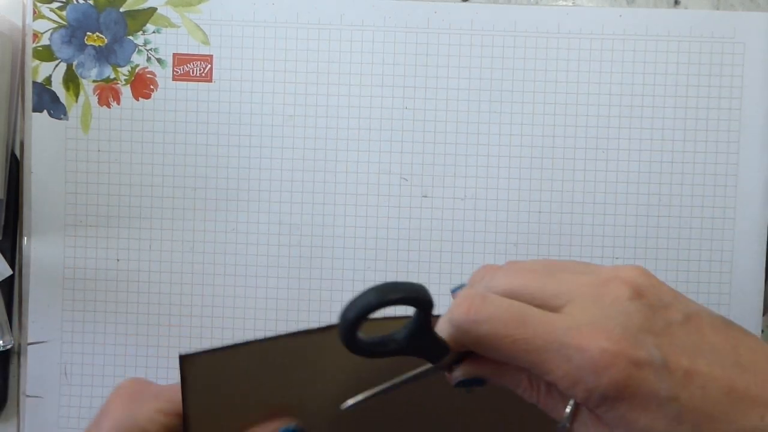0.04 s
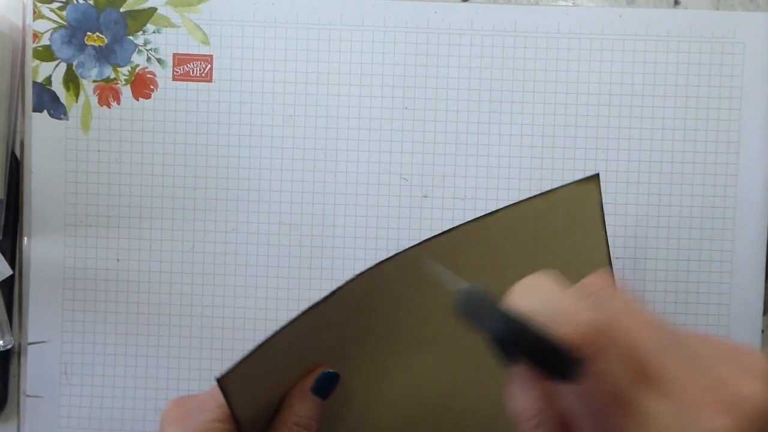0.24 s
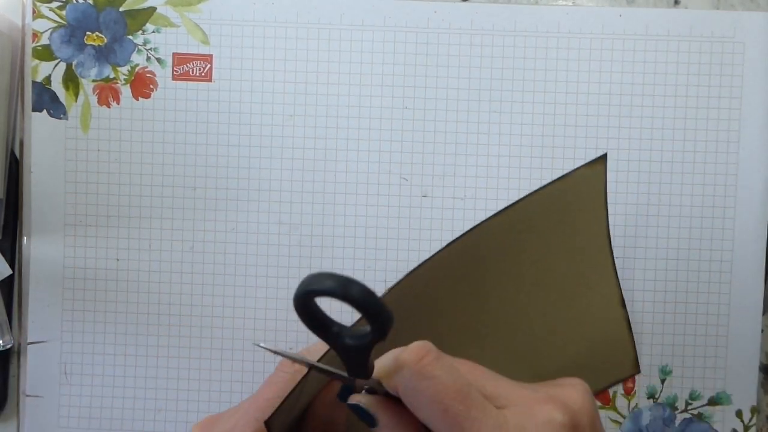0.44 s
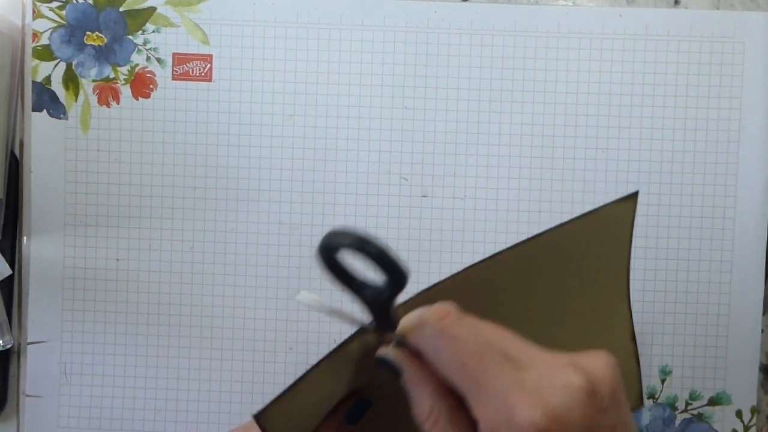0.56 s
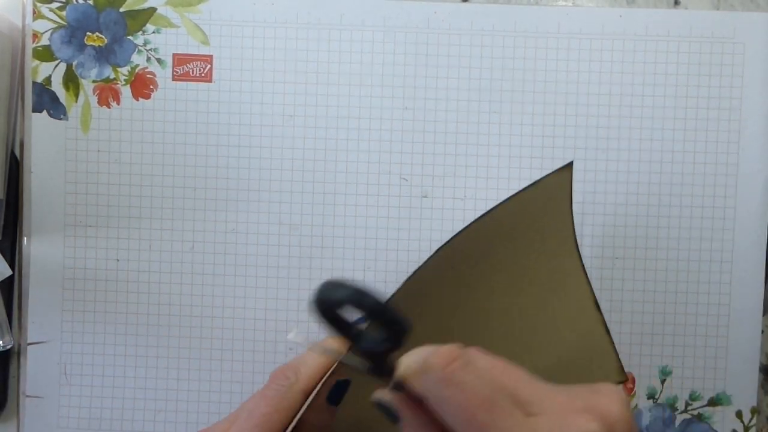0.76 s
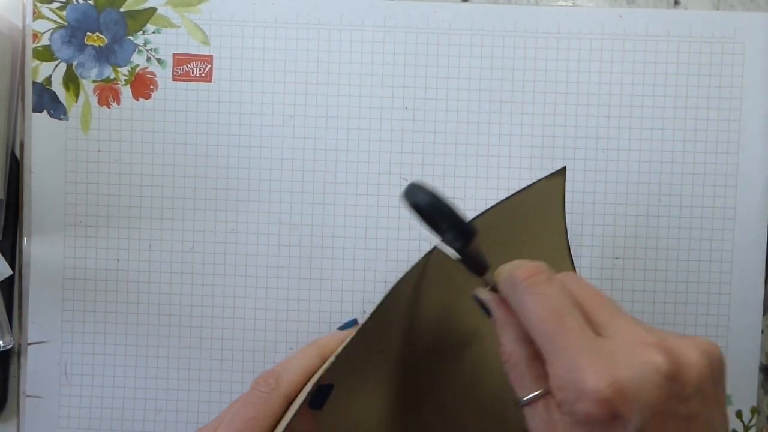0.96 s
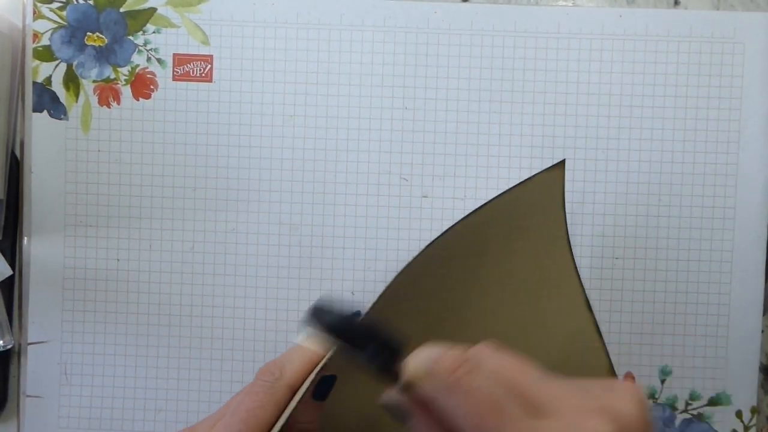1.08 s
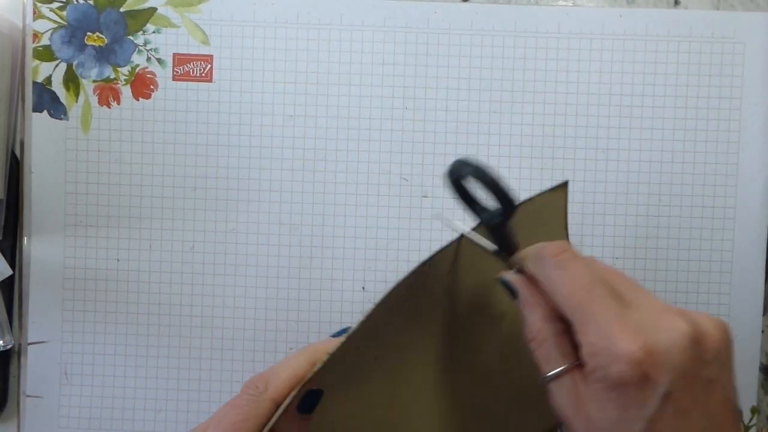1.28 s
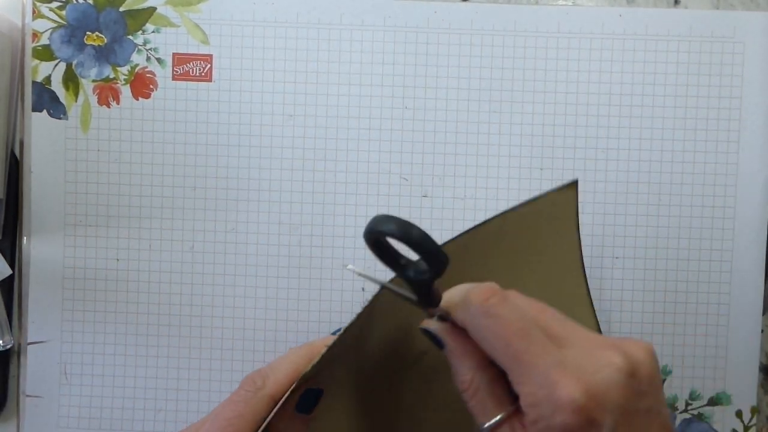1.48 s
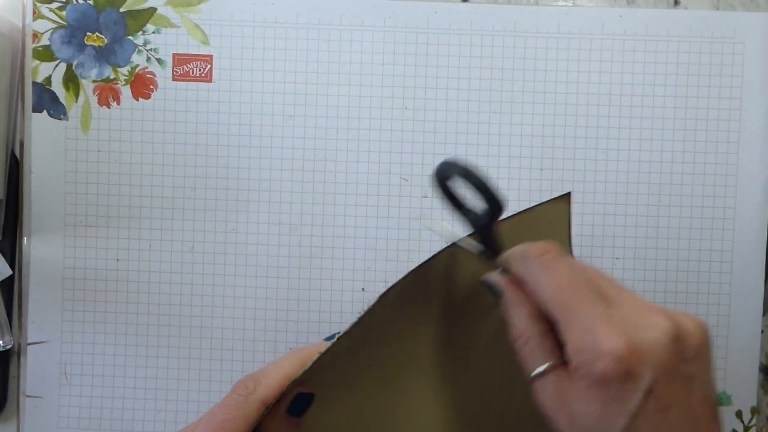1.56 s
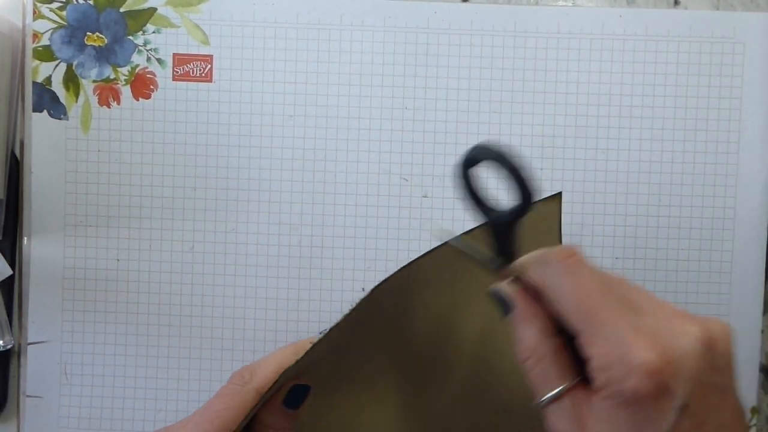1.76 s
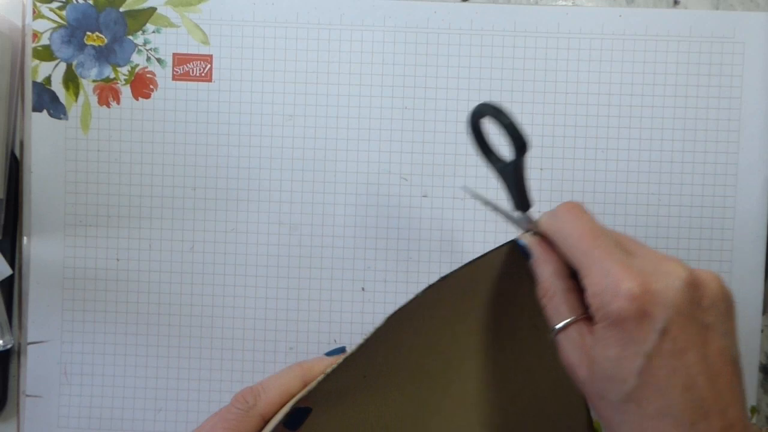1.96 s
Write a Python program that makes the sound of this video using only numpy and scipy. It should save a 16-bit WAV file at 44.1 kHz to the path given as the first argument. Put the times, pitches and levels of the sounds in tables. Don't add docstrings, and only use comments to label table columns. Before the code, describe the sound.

Scissor blade scraping a thick card edge: after faint sheet sliding and finger taps, five quick rough strokes follow, each with a knock and papery rasp, recorded very close in a small quiet room.

```python
import sys
import numpy as np
from scipy import signal
from scipy.fft import rfft, irfft, next_fast_len
from scipy.io import wavfile
from scipy.ndimage import uniform_filter1d, minimum_filter1d

SR = 44100
rng = np.random.default_rng(int(sys.argv[2]) if len(sys.argv) > 2 else 0)


def volts_from_db(level):
    exponent = np.asarray(level, float) / 20
    return 10 ** exponent


def transcribe(u):
    v = np.clip(np.atleast_2d(u).T, -1, 1)
    q = np.round(v * 32767).astype(np.int16)
    wavfile.write(sys.argv[1], SR, q)


N = 89126

# time in seconds, level of the shaking card in dB,
# hiss above that level in dB, ring of the card between grip and blade in Hz.
STROKES = [
    [(0.575, -35, -7, 1210), (0.583, -44, -11, 1210), (0.623, -35, 8, 1080), (0.679, -35, 9.5, 870),
     (0.697, -29.5, 10.5, 920), (0.715, -19, -15.5, 890), (0.741, -37.5, -3, 850), (0.755, -32, -17, 900)],
    [(0.91, -54.5, 0, 909), (0.934, -24.5, -8, 850), (0.97, -15.5, -14.5, 904), (1.036, -21.5, -10, 1180),
     (1.086, -38, -12.5, 1320), (1.128, -46.5, -23, 1290), (1.17, -56, 3, 1110)],
    [(1.228, -73, 18, 970), (1.248, -22.5, -10, 920), (1.284, -16, -21, 856), (1.312, -17, -13.5, 840),
     (1.344, -12, -18, 950), (1.384, -22.5, -7.5, 1280), (1.474, -50.5, -14, 1300), (1.5, -56, -14, 1270)],
    [(1.575, -43.5, -8, 970), (1.601, -19, -15.5, 1050), (1.645, -17.5, -4.5, 1300), (1.703, -19, -3, 990),
     (1.781, -42, -8, 995), (1.831, -55.5, -3, 1200), (1.86, -78, -18, 1170)],
    [(1.93, -33.5, -13, 970), (1.936, -26, -18.5, 920), (1.978, -17, -8.5, 910), (2.02, -16.5, -5, 1080)],
]


def rms_one(x):
    return x / np.sqrt(np.mean(x ** 2) + 1e-20)


def colour(x, points):
    hz, db = np.transpose(points)
    grid = np.maximum(np.fft.rfftfreq(N, 1 / SR), 1)
    gain_db = np.interp(np.log(grid), np.log(hz), db)
    return irfft(rfft(x) * volts_from_db(gain_db), N)


def resonance(x, hz, width_hz):
    r = np.exp(-np.pi * width_hz / SR)
    b = np.array([1, 0, -1]) * (1 - r * r) / 2
    return signal.lfilter(b, [1, -2 * r * np.cos(2 * np.pi * hz / SR), r * r], x)


def gliding(x, hz, width_hz):
    r = np.exp(-np.pi * width_hz / SR)
    out, state = np.zeros(N), np.zeros(2)
    for i in range(0, N, 128):
        a = [1, -2 * r * np.cos(2 * np.pi * hz[i] / SR), r * r]
        out[i:i + 128], state = signal.lfilter([1, 0, -1], a, x[i:i + 128], zi=state)
    return rms_one(out)


def grains(per_s, spread):
    sizes = volts_from_db(spread * np.minimum(rng.exponential(1, N), 5)) * rng.choice([-1, 1], N)
    happens = rng.random(N) < per_s / SR
    return rms_one(sizes * happens + 1e-18)


def drift(hz):
    r = np.exp(-2 * np.pi * hz / SR)
    wander = signal.lfilter([1], [1, -2 * r, r * r], rng.standard_normal(N + 4000))
    return rms_one(wander[4000:])


def gain_curve(s, db):
    fade_s = .012
    times = [s[0] - fade_s, *s, s[-1] + 4 * fade_s]
    levels = [db[0] - 30, *db, db[-1] - 30]
    return volts_from_db(np.interp(np.arange(N) / SR, times, levels, left=-120, right=-120))


def air():
    # pitch in Hz, level in dB.
    air_colour = [(15, -60), (25, -33), (209, -8), (303, -10), (1790, -9.5), (2600, -16.5), (3210, -13.5),
                  (6400, -22.5), (14200, -20)]
    level_db, waver_db, side_db = -51, -0.5, -3.5
    mid, side = (rms_one(colour(v, air_colour)) for v in rng.standard_normal((2, N)))
    stereo = mid + volts_from_db(side_db) * side * [[1], [-1]]
    return volts_from_db(level_db + waver_db * drift(1.1)) * stereo


def sheet_slide():
    # time in seconds, level in dB.
    slide_level = [(0, -55), (.06, -51.5), (.25, -51.5), (.36, -50.5), (.44, -54), (.5, -56), (.6, -88)]
    # pitch in Hz, strength in dB per Hz.
    desk_colour = [(59, -51), (100, -20), (290, -3.5), (403, -19), (637, 0.5), (711, -22), (1910, -12.5),
                   (2390, -25.5), (8000, -29), (10400, -66), (17600, -120)]
    note_hz, sag_hz_per_s, wobble_hz, note_db, waver_db = 1987, 180, 10, -4, 2
    desk = rms_one(colour(rng.standard_normal(N), desk_colour)) * volts_from_db(2.0 * drift(26))
    hz = note_hz - sag_hz_per_s * np.arange(N) / SR + wobble_hz * drift(46)
    note = np.sin(2 * np.pi * np.cumsum(hz) / SR)
    note = volts_from_db(note_db) * volts_from_db(waver_db * drift(29)) * note
    return gain_curve(*np.transpose(slide_level)) * (desk + note)


def finger_rubs():
    # start in seconds, length in seconds, level in dB, attack in seconds, pitch of the patch in Hz.
    rub_events = [(0.0134, 0.029, -46.5, .0051, 10800), (0.0444, 0.023, -40, 0.0083, 800),
                  (0.0563, 0.03, -37, 0.01, 2040), (0.147, 0.028, -33.5, .0011, 844),
                  (0.173, 0.02, -34, 0.0012, 1200), (0.192, .012, -35, .014, 1250),
                  (0.3216, .021, -49.2, .0011, 10000), (0.459, 0.011, -48, 0.0013, 930),
                  (0.492, 0.034, -40.5, 0.0051, 9500), (0.5617, 0.016, -40.5, .0015, 4120),
                  (0.693, 0.01, -33, 0.0034, 9400), (0.764, 0.061, -37.5, .0031, 1290),
                  (0.896, 0.0057, -41, .0007, 3630), (1.2103, .0111, -37.5, 0.00085, 2380),
                  (1.895, 0.0046, -51, 0.00064, 1300)]
    # pitch in Hz, strength in dB per Hz.
    rustle_colour = [(59, -89), (100, -6), (1200, 1.5), (1540, -9.5), (2020, -3.5), (3690, -7.5),
                     (4350, -9), (10800, -13.5), (14200, -14.5)]
    patch_db, patch_sharpness, fall_db_per_s = -5, 12, 454
    rustle = rms_one(colour(grains(4500, 1.8), rustle_colour))
    out = np.zeros(N)
    for s, length, db, attack, hz in rub_events:
        full = s + attack
        end = full + length
        times = [s, full, end, end + 40 / fall_db_per_s]
        shape = gain_curve(times, [db - 11.5, db, db - 13.5, db - 31])
        patch = rms_one(resonance(rustle, hz, hz / patch_sharpness))
        out += shape * (rustle + volts_from_db(patch_db) * patch)
    return out


def taps():
    # time in seconds, peak in dB, hardness as contact cut-off in Hz, crack in dB,
    # bend of the card as a pitch factor.
    landings = [
        (.144, -19.5, 5000, -8, 0.96),
        (0.174, -37, 4000, -23, 1.7),
        (.495, -28, 900, -6.5, 0.89),
        (0.714, -11.5, 1110, -40, 1.2),
        (0.7598, -7.5, 3600, -37, 1.19),
        (0.895, -24.5, 2880, -10, 0.92),
        (1.211, -24.5, 3000, -27, 1.3),
        (1.552, -7, 2900, -27.5, 1.01),
        (1.914, -6, 2660, -26, 0.95),
    ]
    # pitch in Hz, level in dB, time to die away by 60 dB in seconds.
    card_modes = [(425, -12.5, 0.15), (496, -2.5, 0.14), (563, -11, 0.042), (827, -2.5, 0.084),
                  (968, -1, 0.041), (1300, 1.5, 0.022), (1590, -39, 0.041), (1980, -10, 0.018),
                  (2400, -18, 0.011)]
    push_db, push_lag_s, push_s, push_recoil = -2, .0011, .0002, .75
    ring_db, mode_chance_db, longest_ring_s = -14, 2.5, .035
    rebound_s, rebound_loss_db, rebound_dulling = 0.00267, 5, 0.81
    out, t = np.zeros(N + SR), np.arange(SR // 5) / SR
    chance = rng.standard_normal((len(landings), 4, len(card_modes) + 1))
    cracks = rng.standard_normal((len(landings), len(t))) * volts_from_db(-60 * t / .03)
    for (s, db, cut_hz, crack_db, bend), draws, crack in zip(landings, chance, cracks):
        start = int(s * SR)
        out[start:start + len(t)] += volts_from_db(db + crack_db) * signal.lfilter([.5], [1, -.6], crack)
        dent = (t - push_lag_s) / push_s
        push = (1 - push_recoil * dent ** 2) * np.exp(-dent ** 2 / 2)
        out[start:start + len(t)] += volts_from_db(db + push_db) * push
        for k, draw in enumerate(draws):
            body = np.zeros(len(t))
            for (hz, level, t60), c in zip(card_modes, draw):
                decay = volts_from_db(-60 * t / min(t60, longest_ring_s))
                body += volts_from_db(level + mode_chance_db * c) * np.sin(2 * np.pi * hz * bend * t) * decay
            b, a = signal.butter(2, cut_hz * rebound_dulling ** k, fs=SR)
            i = int((s + push_lag_s + rebound_s * k * (1 + 0.17 * draw[-1])) * SR)
            out[i:i + len(t)] += volts_from_db(db + ring_db - rebound_loss_db * k) * signal.lfilter(b, a, body)
    return out[:N]


def catches():
    # time in seconds, size above the ordinary catches in dB.
    burrs = [(0.949, 27), (0.977, 16), (1.262, 15), (1.278, 19), (1.323, 22), (1.366, 19), (1.589, 24),
             (1.596, 21), (1.616, 16), (1.634, 21), (1.651, 21), (1.959, 1)]
    full_speed_db, slow_share = -20, 0.17
    effort = sum(gain_curve(s, db) for s, db, rel, hz in map(np.transpose, STROKES))
    effort = -minimum_filter1d(-effort, size=6001, origin=3000)
    share = np.clip(effort / volts_from_db(full_speed_db), slow_share, 1)
    out = grains(3500 * share, 2.74) * np.sqrt(share.mean() / share)
    s, db = np.transpose(burrs)
    out[(s * SR).astype(int)] += volts_from_db(db)
    return out


def shaken_card(snags):
    # pitch in Hz, width in Hz, level in dB.
    card_rings = [(380, 53, -25), (467.8, 34, 5), (854, 34, -4.5), (993, 168, -2.5), (1196, 114, -4),
                  (1351, 27, 0), (1656, 83, -1.5), (2105, 71, -4), (2430, 223, -6.5), (3250, 170, -9),
                  (3830, 360, -12)]
    # pitch in Hz, strength in dB per Hz.
    card_colour = [(59, -85), (100, -56.5), (451, -10), (665, -7.5), (782, 0), (1060, -15), (2400, -14.5),
                   (10600, -40), (13000, -36.5)]
    fits_db, fits_hz = 5, 25.6
    notch_hz, notch_width_hz, notch_share = 692, 234, 0.87
    span_width_hz, span_db = 137, -5.5
    peaks = np.zeros(N)
    for k, (hz, width_hz, db) in enumerate(card_rings):
        jolts = np.roll(snags, 37 * k) * volts_from_db(fits_db * drift(fits_hz))
        peaks += volts_from_db(db) * resonance(jolts, hz, width_hz)
    card = rms_one(peaks) + rms_one(colour(snags, card_colour))
    card = rms_one(card - notch_share * resonance(card, notch_hz, notch_width_hz))
    s, db, rel, hz = np.concatenate(STROKES).T
    span_hz = np.interp(np.arange(N) / SR, s, hz)
    return rms_one(card + volts_from_db(span_db) * gliding(np.roll(snags, 500), span_hz, span_width_hz))


def fibre_hiss():
    # pitch in Hz, strength in dB per Hz.
    hiss_colour = [(880, -36), (1500, -3), (1650, -23), (2010, -13), (2140, -9.5), (5340, -6.5), (8300, -9),
                   (12200, -7), (14200, -22)]
    blade_hz, blade_width_hz, blade_db = 6560, 72, -15
    hiss = rms_one(colour(grains(9000, 0.41), hiss_colour))
    return hiss + volts_from_db(blade_db) * rms_one(resonance(hiss, blade_hz, blade_width_hz))


def scrape():
    # pitch in Hz, width in Hz, level in dB.
    overhang = [(880, 58, -7), (2380, 190, -8.5), (824, 160, -8.5), (1160, 630, -5.5), (900, 130, -26)]
    judder_db, judder_hz = 1.5, 68
    judder = volts_from_db(judder_db * drift(judder_hz))
    snags = catches() * judder
    card = shaken_card(snags)
    body, slide = np.zeros(N), np.zeros(N)
    for stroke, (free_hz, width_hz, free_db) in zip(STROKES, overhang):
        s, db, rel, span_hz = np.transpose(stroke)
        press = gain_curve(s, db)
        free = rms_one(resonance(snags, free_hz, width_hz))
        body += press * (card + volts_from_db(free_db) * press / press.max() * free)
        slide += gain_curve(s, db + rel)
    return body + slide * fibre_hiss() * np.sqrt(judder)


def blade_whisper():
    # time in seconds, level in dB.
    whisper_level = [(.745, -60), (.78, -55), (.815, -54), (.84, -62), (.87, -48.5), (.91, -59),
                     (1.05, -57), (1.15, -64), (1.175, -56.5), (1.23, -62)]
    hz, width_hz = 6500, 1100
    edge = resonance(rng.standard_normal(N), hz, width_hz)
    edge = rms_one(resonance(edge, hz, 2 * width_hz))
    return gain_curve(*np.transpose(whisper_level)) * edge * volts_from_db(2.1 * drift(40))


def room(x):
    t60_s, wall_cut_hz, wide_hz = 0.22, 22000, 1490
    size = next_fast_len(N + SR)
    w = 2 * np.pi * np.fft.rfftfreq(size, 1 / SR)
    dull = 1 / (1 + 1j * w / (2 * np.pi * wall_cut_hz))
    out = np.zeros((2, size // 2 + 1), complex)
    for k, lag in enumerate(rng.uniform(0.0047, 0.038, 16)):
        loop = volts_from_db(-60 * lag / t60_s) * dull * np.exp(-1j * w * lag)
        out[k % 2] += (-1) ** (k // 2) * loop / (1 - loop)
    wide = 1j * w / (1j * w + 2 * np.pi * wide_hz)
    middle = out.mean(axis=0)
    out = middle + wide * (out - middle)
    return irfft(out * rfft(x, size), size)[:, :N]


def scene():
    # pitch in Hz, side minus middle in dB.
    side_colour = [(60, -10), (110, -23), (200, -17), (370, -18), (670, -19), (1230, -16), (2240, -11.5),
                   (4110, -8.5), (7510, -9.5), (13700, -6)]
    smear_s, sway_hz, sway_rad, left_db, room_db = 0.0016, 11.6, 1.95, 0.24, -20
    near = sheet_slide() + finger_rubs() + taps() + scrape() + blade_whisper()
    smears = rng.standard_normal((2, 800)) * np.exp(-np.arange(800) / (smear_s * SR))
    one, two = (signal.fftconvolve(near, v / np.linalg.norm(v))[:N] for v in smears)
    angle = sway_rad * drift(sway_hz)
    side = colour(one * np.cos(angle) + two * np.sin(angle), side_colour)
    balance = volts_from_db(np.array([[left_db], [-left_db]]))
    return (near + side * [[1], [-1]]) * balance + volts_from_db(room_db) * room(near)


def band_limit(x):
    return signal.sosfilt(signal.butter(12, 15700, fs=SR, output="sos"), x)


def record(dry):
    knee_db, gain_share, recovery_db_per_s = -21.5, 0.56, 8
    low_cut_hz, top_hz, rumble_hz, peak_top = 251, 12440, 170, .95
    power = uniform_filter1d(dry.mean(axis=0) ** 2, size=2000)
    over = np.maximum(10 * np.log10(power + 1e-12) - knee_db, 0)
    ramp = recovery_db_per_s * np.arange(N) / SR
    duck = np.maximum.accumulate(gain_share * over + ramp) - ramp
    x = signal.sosfilt(signal.butter(4, low_cut_hz, "high", fs=SR, output="sos"), dry)
    hush = air()
    rumble = signal.sosfilt(signal.butter(2, rumble_hz, fs=SR, output="sos"), hush)
    x = x + rumble + volts_from_db(-duck) * (hush - rumble)
    x = peak_top * np.tanh(x / peak_top)
    x = signal.sosfilt(signal.butter(6, top_hz, fs=SR, output="sos"), x)
    return band_limit(x)


dry = scene()
out = record(dry)
transcribe(out)
```